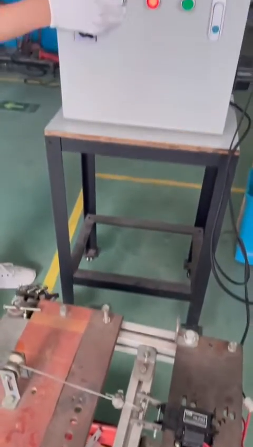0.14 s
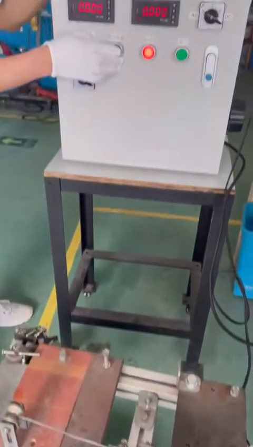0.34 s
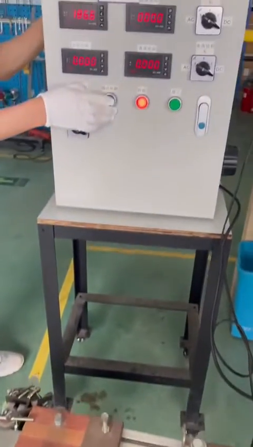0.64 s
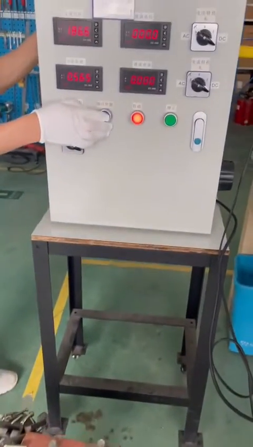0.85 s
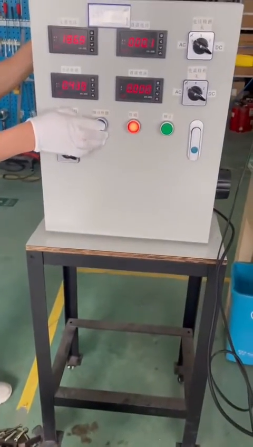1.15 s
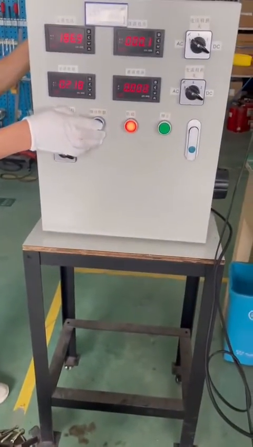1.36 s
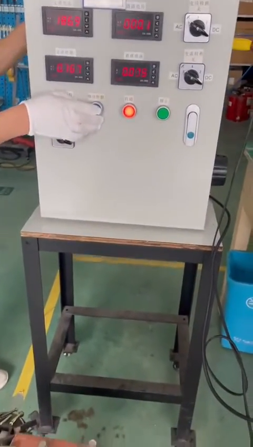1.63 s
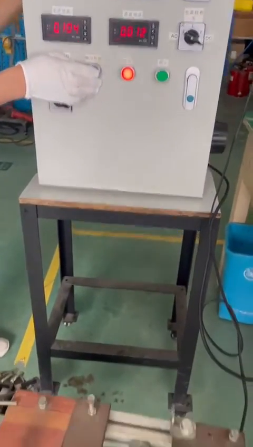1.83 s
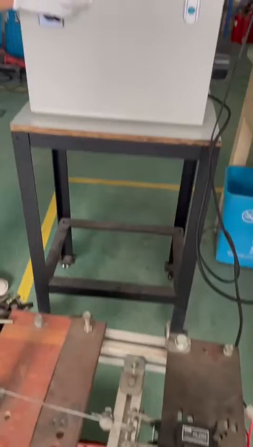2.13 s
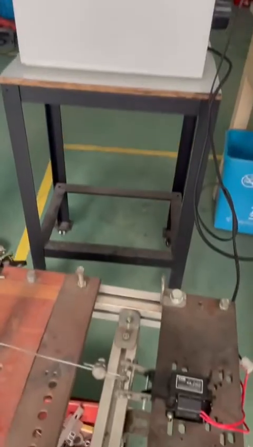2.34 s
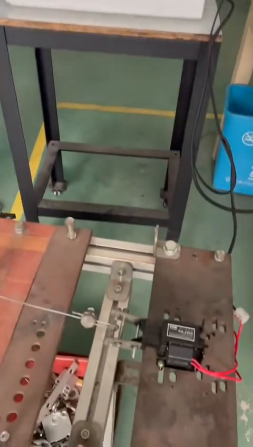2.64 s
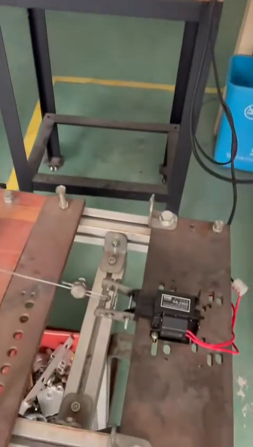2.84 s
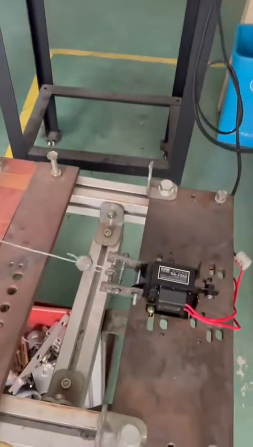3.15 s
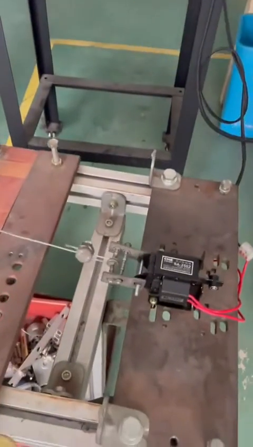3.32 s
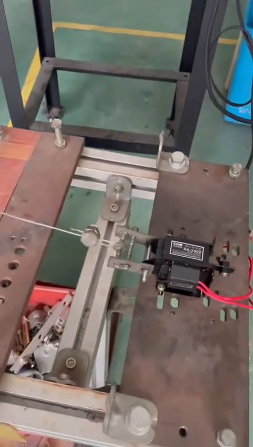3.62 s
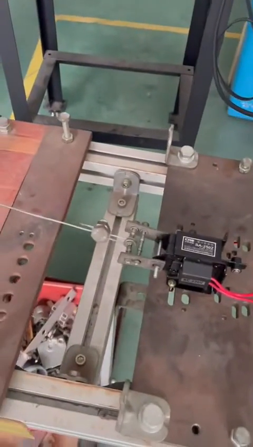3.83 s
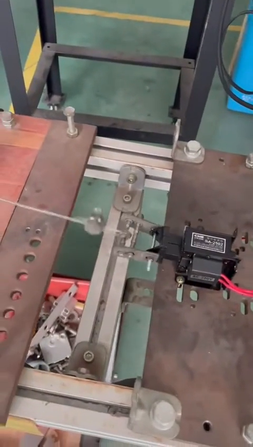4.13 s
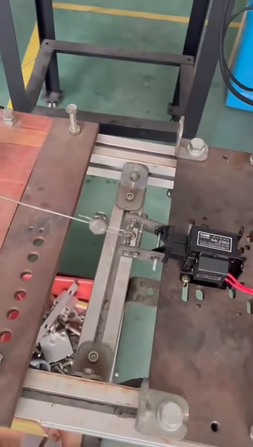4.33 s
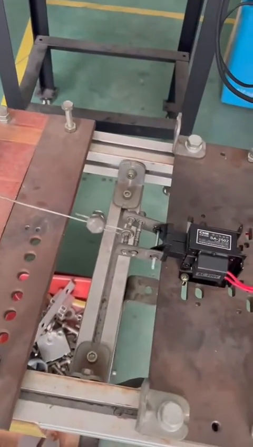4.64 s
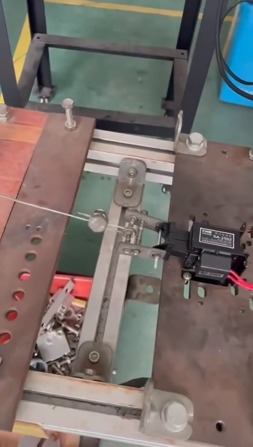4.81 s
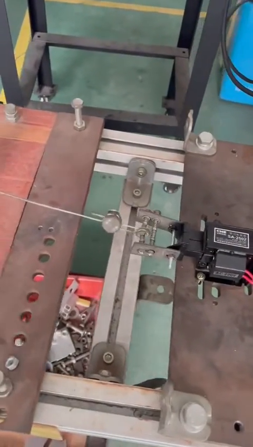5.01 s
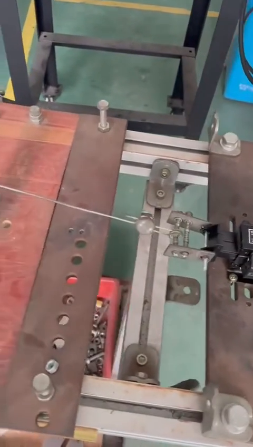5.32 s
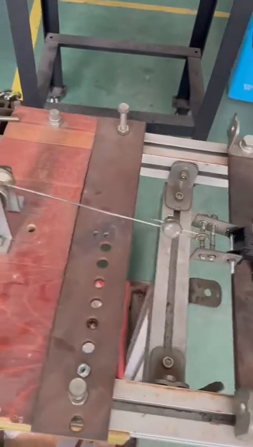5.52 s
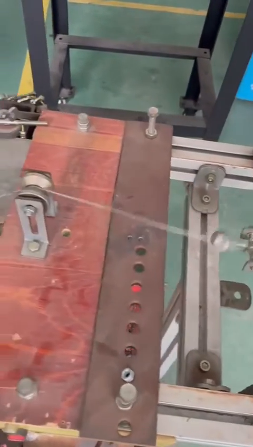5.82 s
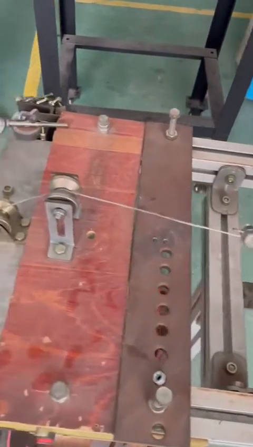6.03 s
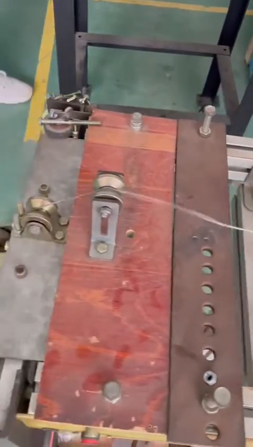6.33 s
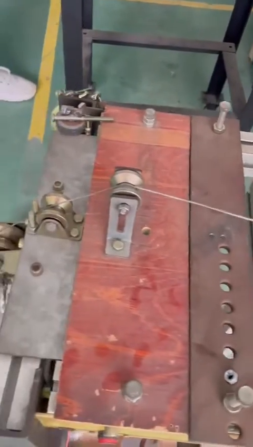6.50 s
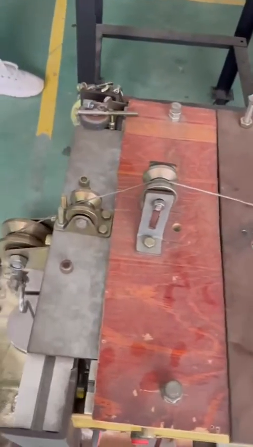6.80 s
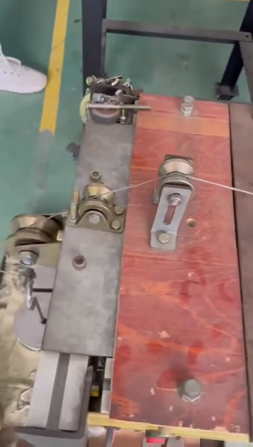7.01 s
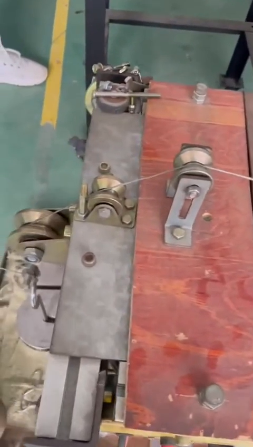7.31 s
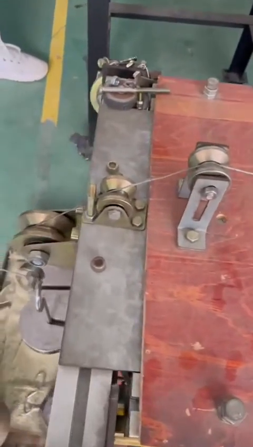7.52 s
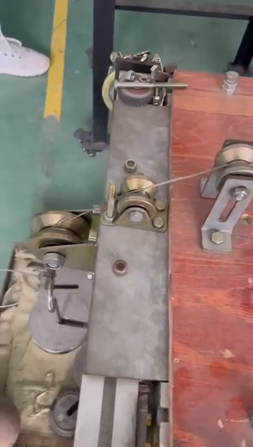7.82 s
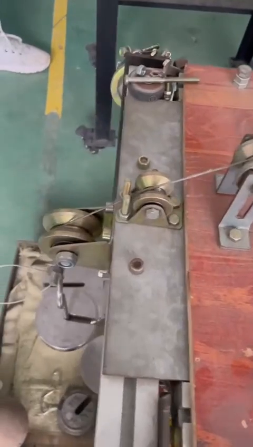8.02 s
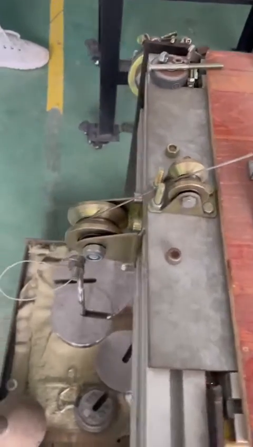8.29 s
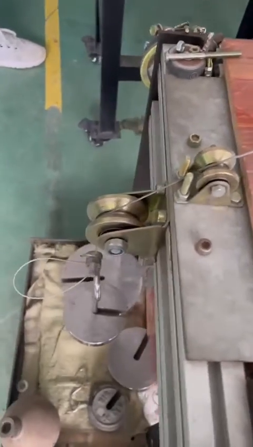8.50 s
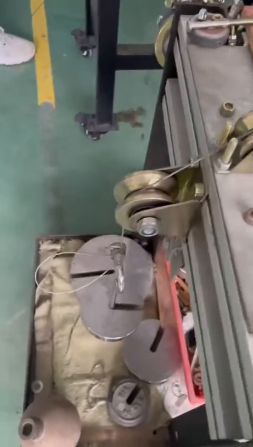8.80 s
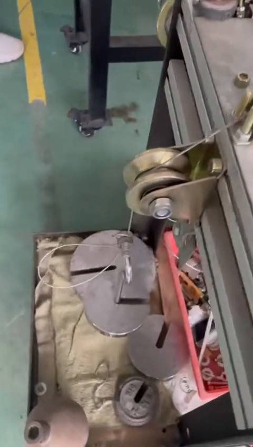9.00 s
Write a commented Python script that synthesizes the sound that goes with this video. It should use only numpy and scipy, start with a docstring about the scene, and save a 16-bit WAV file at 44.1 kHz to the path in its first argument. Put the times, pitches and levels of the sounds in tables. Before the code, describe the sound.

A low factory rumble and motor hum run throughout. Close by, at about 0.3 seconds, a light relay click starts a short buzzing rattle, and a solenoid slams home at 0.4 with a sharp metallic clack that briefly rings the steel frame and loose parts. Around 1.2 seconds it releases with a quieter click, a short scrape and a knock. The same rattle and slam return at about 3.0, 5.7 and 7.9 seconds, the last two ringing a little harder. Softer releases follow at about 4.0, 6.3 and 8.5 seconds, with small clinks and ticks as the plunger settles. From roughly 2 to 4.5 seconds, faint, evenly spaced distant blows echo through the hall, returning more weakly after 8 seconds. A thin motor whine swells slightly around 4 seconds and sinks back. Each clack carries a short hall echo.

```python
"""A relay clicks and an AC solenoid rattles, then slams home, lifting a weight on a wire four times.
The magnet tugs the plunger at twice the mains rate while it travels; it hits the core and rings the
steel rig's frame, lever and loose parts. On release it slides back and knocks on its stop.
Behind it, motors hum and far-off work echoes through a factory hall."""
import sys
import numpy as np
from scipy import signal
from scipy.fft import rfft, irfft
from scipy.io import wavfile
from scipy.ndimage import uniform_filter1d, map_coordinates

SR = 44100
rng = np.random.default_rng(int(sys.argv[2]) if len(sys.argv) > 2 else 0)


def write(x):
    x = np.atleast_2d(x).T
    wavfile.write(sys.argv[1], SR, np.round(np.clip(x, -1, 1) * 32767).astype(np.int16))


N = 403515
T = np.arange(N) / SR
RING_T = T[:SR // 3]  # time axis of one short ring
MAINS_HZ = 50
TUG_HZ = 2 * MAINS_HZ
PULL_LAG_S, THUD_LAG_S, LEVER_JERK_S = 0.0295, 0.001387, 0.0307  # after switch-on, slam, switch-off


# Plunger pulls: on_s, rattle_db, tick_db, swell_db, wire_slack_s
PULL_STROKES = [(0.246, -23.5, -46, -3, 0.016), (2.8677, -32, -39.5, 8.5, 0.0045),
                (5.569, -23.5, -36.5, 3, 0.0115), (7.741, -21.5, -37.5, 3, 0.0087)]
# Rattle spectrum: freq_hz, gain_db
RATTLE_SPECTRUM = [(45, -6.5), (90, -3), (190, 0), (240, -5), (400, -4.5), (1150, -7), (1500, -12.5),
                   (2200, -13.5), (2700, -18.5), (4000, -25.5), (5200, -20), (7000, -33.5), (13500, -36)]
# Spectrum of small metal ticks: freq_hz, gain_db
TICK_SPECTRUM = [(400, -9.5), (2000, 3), (5500, 0.5), (7000, -8), (10000, 0.5), (13500, -3.5)]

def pull_in():
    """The magnet tugs twice per mains cycle: the plunger chatters in its guide and the bed hums."""
    on_s, rattle_db, tick_db, swell_db, slack_s = np.transpose(PULL_STROKES)
    start_s = on_s + PULL_LAG_S
    end_s = np.transpose(CORE_HITS)[0] + 0.0045
    tug_age_s = T % (1 / TUG_HZ)
    tug_index = (T * TUG_HZ).astype(int)
    uneven = amp(0.87 * rng.standard_normal(tug_index[-1] + 1))[tug_index]
    rattle_gain = strokes(start_s, end_s, rattle_db, swell_db, edge_s=0.0023)
    tug_pulse = 0.61 + 0.51 * np.exp(-tug_age_s / 0.0031)
    rattle = rattle_gain * uneven * tug_pulse * amp(0.7 * drift(600)) * noise()
    # the linkage jolts twice as the wire comes taut
    jolt_s, jolt_db = bounces(start_s + slack_s, levels_db=-23, gap_s=0.014, loss_db=2.5, count=2)
    jolts = bursts(jolt_s, jolt_db, rise_s=0.0009, t60_s=0.058)
    # the laminations tick just before the heavy parts move
    tick_gain = strokes(start_s - 0.008, end_s, tick_db, swell_db=0, edge_s=0.0069)
    ticks = tick_gain * uneven * (0.07 + 2.3 * np.exp(-tug_age_s / 0.001)) * noise()
    break_free = bursts(start_s - 0.006, tick_db - 0.5, rise_s=0.00082, t60_s=0.11)
    hum_gain = strokes(start_s, end_s, rattle_db - 8.5, swell_db, edge_s=0.0076)
    hum = hum_gain * np.sqrt(2) * np.sin(2 * np.pi * TUG_HZ * T)
    return colour(rattle + jolts, RATTLE_SPECTRUM) + colour(ticks + break_free, TICK_SPECTRUM) + hum


# Modes of the hollow lever and plunger guide: pitch_hz, gain_db, t60_s
LEVER_MODES = [(350.7, -6.5, 0.11), (430.5, -8, 0.1), (697, -6.5, 0.092), (778, -9, 0.066),
               (879, -7, 0.089), (1001, 1, 0.061), (1105, -6.5, 0.09), (1204, -2.5, 0.063),
               (1505, -7, 0.098), (2080, -11.5, 0.1), (2250, -11, 0.06), (2580, -16.5, 0.1),
               (2830, -13.5, 0.09), (3350, -11, 0.05), (4600, -18, 0.071), (5130, -9.5, 0.045),
               (5300, -15, 0.05)]

def lever_chatter():
    """The lever rings at every tug of the magnet and jolts as the wire comes taut."""
    on_s, rattle_db, _, swell_db, slack_s = np.transpose(PULL_STROKES)
    start_s = on_s + PULL_LAG_S
    slam_s = np.transpose(CORE_HITS)[0]
    tug_s, tug_db = np.transpose([
        (t, db - 15 + swell * (t - start) / (end - start))
        for start, end, db, swell in zip(start_s, slam_s, rattle_db, swell_db)
        for t in np.arange(np.ceil(start * TUG_HZ), end * TUG_HZ) / TUG_HZ])
    chatter = strike(LEVER_MODES, tug_s, tug_db, tilt_db_oct=-1.3, scatter_db=3)
    # after each tug the plunger strikes the far side of its guide
    backlash_s = tug_s + 0.004 * rng.uniform(0.5, 1.5, len(tug_s))
    backlash = strike(LEVER_MODES, backlash_s, tug_db - 6.5, tilt_db_oct=1, scatter_db=5)
    jolt = strike(LEVER_MODES, start_s + slack_s, rattle_db - 7.5, tilt_db_oct=-5, scatter_db=6)
    return chatter + backlash + jolt


# Plunger hits the core: start_s, crack_db, clink_db, thud_db, touch_rel_db, touch_lead_s,
# frame_db, frame_tilt_db_oct, low_clink_hz, high_clink_hz, low_clink_t60_s
CORE_HITS = [(0.393, -14, -9.5, -16, -12, 0.0086, -28.5, 1.5, 5740, 5780, 0.017),
             (3.0104, -14.5, -8.5, -23, -6.5, 0.01, -30.5, 2, 5380, 6070, 0.023),
             (5.7101, -18.5, -5.5, -18, 1, 0.0069, -17, -0.5, 5420, 5940, 0.013),
             (7.8804, -12.5, -13.5, -17.5, -15, 0.0065, -25, 0, 4920, 6370, 0.048)]
# Iron crack spectrum: freq_hz, gain_db
CRACK_SPECTRUM = [(300, -2), (1000, -11), (2000, -1.5), (3000, -2.5), (4500, -7), (5800, -2), (6700, -14.5),
                  (9500, -10), (13500, -13)]
# Bed plate spectrum: freq_hz, gain_db
BED_SPECTRUM = [(60, 0), (130, 3), (175, 1), (230, -14.5), (400, -7.5), (950, -3.5), (1350, -7.5),
                (1800, -15), (5300, -12.5), (7000, -22), (13500, -36.5)]

def slam():
    """Iron meets iron: a short crack, then the bed plate thuds."""
    _, crack_db, _, thud_db, *_ = np.transpose(CORE_HITS)
    crack = bursts(*seating(crack_db), rise_s=0.00087, t60_s=0.022)
    contact_s, contact_db = seating(thud_db)
    thud = bursts(contact_s + THUD_LAG_S, contact_db, rise_s=0.0025, t60_s=0.11)
    return colour(crack, CRACK_SPECTRUM) + colour(thud, BED_SPECTRUM)


def seating(levels_db):
    """Times and levels of each slam's contacts: first touch, full blow, one rebound."""
    slam_s, _, _, _, touch_rel_db, lead_s, *_ = np.transpose(CORE_HITS)
    blow_s, blow_db = bounces(slam_s, levels_db, gap_s=0.0074, loss_db=19, count=2)
    return np.append(slam_s - lead_s, blow_s), np.append(levels_db + touch_rel_db, blow_db)


def core_clink():
    """The laminated core clinks on two well damped notes that depend on how the plunger seats."""
    out = np.zeros(N)
    for slam_s, _, clink_db, _, touch_rel_db, lead_s, _, _, low_hz, high_hz, t60_s in CORE_HITS:
        low = ring(low_hz, rise_s=0.00055, t60_s=t60_s)
        high = ring(high_hz, rise_s=0.00067, t60_s=0.012)
        clink = amp(clink_db) * (low + high)
        out += place([slam_s - lead_s, slam_s], [amp(touch_rel_db - 11) * clink, clink])
    return out


# Steel frame modes: pitch_hz, gain_db, t60_s
FRAME_MODES = [(387.5, -0.5, 0.13), (682, 1, 0.1013), (900, -15.5, 0.11), (972, -12, 0.13),
               (1047, -2, 0.081), (1227, -6, 0.18), (1370, -8, 0.14), (1487, -13.5, 0.12),
               (2120, -11, 0.13), (2252, -12, 0.17), (2760, -13, 0.16), (2912, -6, 0.11), (3280, -13, 0.1),
               (3480, -8.5, 0.11), (3690, -7, 0.16), (4050, -9.5, 0.13), (4300, -12, 0.09),
               (4540, -9.5, 0.1), (4785, -12.5, 0.11), (5130, -10, 0.11), (5030, -11, 0.12),
               (5150, -9, 0.12), (5500, -12.5, 0.08), (5900, -14, 0.09)]

def frame_ring():
    """The frame rings hard at each slam."""
    slam_s, _, _, _, _, _, frame_db, tilt_db_oct, *_ = np.transpose(CORE_HITS)
    return strike(FRAME_MODES, slam_s + THUD_LAG_S, frame_db, tilt_db_oct, scatter_db=2.9)


def frame_shiver(contacts_per_s=55, length_s=0.25, fade_db_per_s=51.5):
    """Loose parts rattle on the frame at random, ever more weakly, after each slam."""
    slam_s = np.transpose(CORE_HITS)[0]
    steps = np.arange(1, length_s * contacts_per_s)[:, None]
    age_s = (steps + rng.uniform(0, 1, (len(steps), len(slam_s)))) / contacts_per_s
    contact_db = np.ravel(-43 - fade_db_per_s * age_s)
    return strike(FRAME_MODES, np.ravel(slam_s + age_s), contact_db, tilt_db_oct=-0.7, scatter_db=3.5)


# Plunger returns: off_s, stop_s, slide_db, lever_db, tick_db, ping_db
RETURN_STROKES = [(1.2066, 1.315, -34, -33.5, -35.5, -38), (3.91, 4.0103, -30, -35, -33, -17),
                  (6.2365, 6.336, -33.5, -32.5, -35, -36), (8.4525, 8.548, -34, -31.5, -37, -20)]
# Plunger settling on its stop: start_s, level_db
STOP_BOUNCES = [(1.3595, -45), (1.382, -49), (4.055, -44), (4.0775, -48), (4.096, -49), (6.3825, -39),
                (6.4295, -44), (6.4475, -51), (8.577, -48), (8.5938, -35), (8.6165, -49)]
# Sliding friction spectrum: freq_hz, gain_db
SLIDE_SPECTRUM = [(100, 2), (350, 11.5), (1000, -3.5), (2000, 1), (3000, -13.5), (5500, -16.5), (7000, -27),
                  (13500, -29)]
# Landing knock spectrum: freq_hz, gain_db
KNOCK_SPECTRUM = [(70, -1.5), (150, 8), (210, -3), (380, 0), (700, -4.5), (1300, -13.5), (2500, -17),
                  (5500, -26.5), (13000, -42)]

def release():
    """The weight drags the plunger back in jerks; the lever lands, then the plunger hits its stop."""
    off_s, stop_s, slide_db, lever_db, tick_db, _ = np.transpose(RETURN_STROKES)
    land_s = stop_s - 0.0159
    slide_gain = strokes(off_s + 0.0064, land_s, slide_db, swell_db=-4, edge_s=0.025)
    slide = slide_gain * amp(2.8 * drift(220)) * noise()
    stop_db = np.full(len(stop_s), -31)
    knock = bursts(np.append(land_s, stop_s), np.append(lever_db, stop_db), rise_s=0.0009, t60_s=0.37)
    tick = bursts(stop_s, tick_db, rise_s=0.00044, t60_s=0.014)
    settle = bursts(*np.transpose(STOP_BOUNCES), rise_s=0.0004, t60_s=0.012)
    # the loose lever clacks as it is jerked away and again as it lands
    clack_s = np.append(off_s + LEVER_JERK_S, land_s)
    clack = bursts(clack_s, np.tile(lever_db, 2), rise_s=0.0016, t60_s=0.093)
    return (colour(slide, SLIDE_SPECTRUM) + colour(knock, KNOCK_SPECTRUM) + colour(tick, TICK_SPECTRUM)
            + band(clack, 800, 3900) + band(settle, 6000, 15000))


def pin_ping():
    """A small pin pings as the plunger hits its stop, too high to carry through the hall."""
    _, stop_s, *_, ping_db = np.transpose(RETURN_STROKES)
    return place(stop_s, np.outer(amp(ping_db), ring(12700, rise_s=0.0007, t60_s=0.011)))


# Pivot knocks: start_s, level_db, tilt_db_oct
PIVOT_KNOCKS = [(0.293, -26.5, 0), (0.3065, -25.5, -1.5), (1.2105, -38.5, -1.5), (1.238, -43, -3),
                (1.2625, -42, -4), (1.307, -37, 1), (2.902, -32, 1), (2.917, -33.5, -5.5), (3.939, -34, 2),
                (3.964, -36, 5), (3.9985, -43, -7), (4.011, -36, 0), (5.611, -22.5, -1.5),
                (5.716, -18.5, -2), (6.267, -37, -1), (6.275, -36, -5), (6.286, -40, 5), (6.311, -42, -8),
                (6.3401, -43, -5), (7.8725, -23.5, 1), (7.886, -17.5, -1), (7.897, -22.5, 1),
                (8.485, -36, -2), (8.499, -33, -0.5), (8.547, -30.5, -2), (8.559, -38, -5)]

def lever_knocks(catches_per_s=90):
    """The lever knocks in its pivot as the load shifts, and rings as the returning plunger catches."""
    off_s, stop_s, slide_db, *_ = np.transpose(RETURN_STROKES)
    catch_s, catch_db = np.transpose([
        (t, db - 18) for start, end, db in zip(off_s + LEVER_JERK_S, stop_s, slide_db)
        for t in np.arange(start, end, 1 / catches_per_s)])
    catch_s += rng.uniform(0, 1, len(catch_s)) / catches_per_s
    knocks = strike(LEVER_MODES, *np.transpose(PIVOT_KNOCKS), scatter_db=3)
    return knocks + strike(LEVER_MODES, catch_s, catch_db, tilt_db_oct=-3.5, scatter_db=5)


# Link and washer contacts: start_s, pitch_hz, level_db, t60_s, grit_share
LINK_HITS = [(0.3985, 5500, -19, 0.028, 1), (1.183, 2280, -40, 0.086, 0.5), (1.237, 5270, -36.5, 0.04, .9),
             (1.316, 5300, -33, 0.02, .9), (2.893, 5200, -30.5, 0.076, 0.8), (2.987, 5160, -23, 0.053, .9),
             (3.018, 5400, -22, 0.023, 1), (3.958, 4970, -32, 0.045, .95), (3.9935, 5020, -29, 0.022, 0.4),
             (4.0115, 4500, -32, 0.018, .9), (4.089, 5100, -35.5, 0.021, 0.6),
             (5.681, 4680, -21, 0.044, .35), (6.339, 4900, -31, 0.019, .85), (6.429, 5000, -35, 0.016, .8),
             (7.873, 4900, -25, 0.03, .9), (7.887, 5020, -15, 0.04, .6), (7.897, 5100, -20, 0.05, .6),
             (8.4655, 5500, -39, 0.025, .9), (8.475, 5200, -35, 0.04, 1),
             (8.4808, 1880, -22.5, 0.044, 0.97), (8.495, 5730, -34.5, 0.03, 0.93),
             (8.5335, 5200, -41, 0.02, .9), (8.541, 4300, -32, 0.022, .85)]

def link_clinks():
    """Links and washers strike each other: a dry snap around one short note."""
    sounds = []
    for _, pitch_hz, level_db, t60_s, grit_share in LINK_HITS:
        grit = unit(band(rng.standard_normal(len(RING_T)), pitch_hz / 1.3, pitch_hz * 1.13))
        snap = envelope(rise_s=0.0004, t60_s=t60_s) * grit
        note = ring(pitch_hz, rise_s=0.0007, t60_s=t60_s)
        sounds.append(amp(level_db) * (np.sqrt(1 - grit_share) * note + np.sqrt(grit_share / 2) * snap))
    return place(np.transpose(LINK_HITS)[0], sounds)


# Ringing loose parts: start_s, pitch_hz, level_db
CHIME_NOTES = [(0.436, 1230, -24), (0.435, 2290, -26.5), (0.435, 1370, -33), (5.756, 1180, -34),
               (7.924, 1220, -22), (8.96, 5360, -47), (8.965, 5080, -44)]

def chimes():
    """Shaken loose parts sing briefly, one mode each."""
    notes = [amp(db) * ring(hz, rise_s=0.03, t60_s=0.19) for _, hz, db in CHIME_NOTES]
    return place(np.transpose(CHIME_NOTES)[0], notes)


def relay():
    """A light click just ahead of each movement; the relay's spring buzzes on after switch-off."""
    on_s, off_s = np.transpose(PULL_STROKES)[0], np.transpose(RETURN_STROKES)[0]
    on_click = bursts(on_s, levels_db=-44, rise_s=0.0012, t60_s=0.14)
    off_click = bursts(off_s, levels_db=-43, rise_s=0.0006, t60_s=0.025)
    spring = bursts(off_s, levels_db=-49, rise_s=0.0036, t60_s=0.27)
    return colour(on_click + off_click + spring, TICK_SPECTRUM)


# Narrow spectral dips: centre_hz, width_hz, gain_db
NARROW_DIPS = [(1350, 42, 0), (2415, 170, -5.5), (3180, 100, -4.5), (3780, 130, -9), (4190, 140, -5.5)]

def narrow_dips(x):
    """A few narrow dips cut into the midrange of the rattles and knocks."""
    for centre_hz, width_hz, gain_db in NARROW_DIPS:
        in_band = signal.lfilter(*signal.iirpeak(centre_hz, centre_hz / width_hz, fs=SR), x)
        x = x - (1 - amp(gain_db)) * in_band
    return x


def hall_echo(x, air_drift_s=0.00007):
    """Quick reflections from benches and floor, then the hall's tail; moving air shifts their arrival."""
    t = T[:2 * SR]
    early, low, high = rng.standard_normal((3, len(t)))
    response = (amp(-49.5) * band(early, 93, 13000) * amp(-60 * t / 0.47)
                + amp(-46) * band(low, 60, 3300) * amp(-60 * t / 0.73)
                + amp(-52) * band(high, 2000, 11000) * amp(-60 * t / 0.89))
    wet = convolve(x, response * np.clip(t / 0.0039, 0, 1))
    return map_coordinates(wet, [(T + air_drift_s * drift(70)) * SR], mode="nearest")


# Runs of distant blows: start_s, end_s, level_db
FAR_RUNS = [(1.859, 4.4, -37.5), (8.08, 8.9, -47.5)]
# Distant clatter spectrum: freq_hz, gain_db
FAR_SPECTRUM = [(100, -6), (350, 4.5), (1100, -3.5), (1800, -8), (3000, -11), (5500, -15.5), (7000, -22.5),
                (10000, -29), (13000, -40.5)]

def far_work(period_s=0.5606):
    """Evenly spaced distant blows arrive as swells of reverberation with a duller tail."""
    blow_s, blow_db = np.transpose([
        (t, db) for start, end, db in FAR_RUNS for t in np.arange(start, end, period_s)])
    swell = bursts(blow_s, blow_db, rise_s=0.2, t60_s=0.49)
    tail = band(bursts(blow_s, blow_db - 2, rise_s=0.077, t60_s=1.9), 80, 5500)
    return colour(swell + tail, FAR_SPECTRUM) * amp(1.1 * drift(40))


# Faint scrapes: start_s, level_db, t60_s
SCRAPES = [(0.0, -52.5, 0.25), (5.022, -61.5, .25), (6.54, -59, 0.28), (6.751, -52, .3), (7.293, -63, 0.46),
           (8.592, -57.5, 1.8)]

def rustles():
    """Soft nearby scrapes swell and fade."""
    rub = sum(bursts([start_s], [db], 0.17 * t60_s, t60_s) for start_s, db, t60_s in SCRAPES)
    spectrum = [(500, -20.5), (2500, 0), (5500, 0), (8000, -8.5), (13000, -12)]
    return colour(rub * amp(1.2 * drift(60)), spectrum)


# Low thumps: start_s, relative_db
THUMPS = [(4.649, -40), (5.969, -30.5), (8.405, -28.5)]

def thumps():
    """Dull thumps, each one damped note deep in the bass."""
    thump = amp(15.5) * ring(67, rise_s=0.014, t60_s=0.14)
    return convolve(impulses(*np.transpose(THUMPS)), thump)


# Factory rumble spectrum: freq_hz, gain_db
RUMBLE_SPECTRUM = [(15, -41), (25, -18), (60, -0.5), (333, -20), (361, -20.5), (401, -24), (482, -18),
                   (522, -23.5), (1460, -34.5), (3410, -40), (5630, -47.5), (6960, -55), (7740, -68.5),
                   (9560, -57), (13800, -69.5)]

def factory_rumble(level_db=-37.5):
    """Low factory noise whose eight bands waver independently."""
    edges_hz = np.geomspace(20, 16000, 9)
    air = sum(band(noise(), low_hz, high_hz) * amp(drift(7) + 0.8 * drift(1.8))
              for low_hz, high_hz in zip(edges_hz, edges_hz[1:]))
    return amp(level_db) * unit(band(colour(air, RUMBLE_SPECTRUM), 34, 16000))


def motors(shaft_hz=49.1, whine_hz=479, peak_s=4.08, width_s=3):
    """A motor shaft hums; a thin whine swells once and sinks back."""
    shaft = amp(-40 + 2 * drift(3.2)) * np.sin(2 * np.pi * shaft_hz * T + 0.7 * drift(2.6))
    swell_db = 19 * np.exp(-((T - peak_s) / width_s) ** 2)
    whine = amp(-64 + swell_db + 2 * drift(9)) * np.sin(2 * np.pi * whine_hz * T + 0.77 * drift(14))
    return shaft + whine


def strike(modes, times_s, levels_db, tilt_db_oct, scatter_db):
    """Hard blows on a steel body; the contact is rough, so each one favours other modes."""
    rings = np.array([amp(db) * ring(hz, rise_s=0.00078, t60_s=t60_s) for hz, db, t60_s in modes])
    octaves = np.log2(np.transpose(modes)[0] / 2000)
    polarity, scatter = rng.standard_normal((len(times_s), 2, len(modes))).swapaxes(0, 1)
    mode_db = levels_db[:, None] + np.outer(tilt_db_oct, octaves) + scatter_db * scatter
    return place(times_s, (np.sign(polarity) * amp(mode_db)) @ rings)


def bursts(times_s, levels_db, rise_s, t60_s):
    """Crowded modes after each blow: noise that rises and dies away."""
    shape = envelope(rise_s, t60_s, T[:int(1.5 * t60_s * SR)])
    power = convolve(impulses(times_s, levels_db) ** 2, (shape / shape.max()) ** 2)
    return noise() * np.sqrt(np.maximum(power, 0))


def bounces(times_s, levels_db, gap_s, loss_db, count):
    """Times and levels of blows that repeat at even gaps, weaker every time."""
    repeat = np.arange(count)[:, None]
    bounce_db = levels_db - repeat * loss_db + np.zeros(len(times_s))
    return np.ravel(times_s + repeat * gap_s), np.ravel(bounce_db)


def strokes(starts_s, ends_s, levels_db, swell_db, edge_s):
    """Gain during a set of movements, with soft edges."""
    return sum(np.interp(T, [start, min(start + edge_s, end), end, end + edge_s],
                         [0, amp(db), amp(db + swell), 0])
               for start, end, db, swell in np.broadcast(starts_s, ends_s, levels_db, swell_db))


def ring(pitch_hz, rise_s, t60_s):
    """One damped mode."""
    return envelope(rise_s, t60_s) * np.sin(2 * np.pi * pitch_hz * RING_T)


def envelope(rise_s, t60_s, t=RING_T):
    """Exponential rise and decay."""
    return (1 - np.exp(-t / rise_s)) * amp(-60 * t / t60_s)


def impulses(times_s, levels_db):
    """One impulse per blow."""
    out = np.zeros(N)
    samples = np.round(np.asarray(times_s) * SR).astype(int)
    np.add.at(out, np.clip(samples, 0, N - 1), amp(levels_db))
    return out


def place(times_s, sounds):
    """Mix short sounds in at their times."""
    out = np.zeros(N + len(RING_T))
    for start_s, sound in zip(times_s, sounds):
        i = int(np.clip(start_s * SR, 0, N))
        out[i:i + len(sound)] += sound
    return out[:N]


def colour(x, spectrum, size=4096):
    """Minimum-phase filter through (freq_hz, gain_db) points; white noise keeps its power."""
    freq_hz, gain_db = np.transpose(spectrum)
    bins_hz = np.maximum(np.fft.rfftfreq(size, 1 / SR), 1)
    bins_db = np.interp(np.log(bins_hz), np.log(freq_hz), gain_db)
    cepstrum = irfft(np.log(amp(bins_db)))
    cepstrum[1:size // 2] *= 2
    cepstrum[size // 2 + 1:] = 0
    response = irfft(np.exp(rfft(cepstrum)))
    return convolve(x, response / np.linalg.norm(response))


def band(x, low_hz, high_hz):
    """Band-pass."""
    return signal.sosfilt(signal.butter(2, [low_hz, high_hz], "band", fs=SR, output="sos"), x)


def convolve(x, response):
    """Apply an impulse response."""
    return signal.oaconvolve(x, response)[:N]


def drift(rate_hz):
    """Smooth random drift, spread near 1."""
    hold = int(SR / rate_hz)
    steps = np.repeat(rng.standard_normal(N // hold + 1), hold)
    return 1.2 * uniform_filter1d(steps, hold)[:N]


def noise():
    """White noise, rms 1."""
    return rng.standard_normal(N)


def unit(x):
    """Scale to rms 1."""
    return x / np.std(x)


def amp(db):
    """Decibels to gain."""
    return np.exp(np.asarray(db) * (np.log(10) / 20))


def scene():
    """The rig close by, its echo and the factory behind it, in mono."""
    rig = narrow_dips(pull_in() + slam() + release() + relay())
    steel = lever_chatter() + frame_ring() + frame_shiver() + lever_knocks()
    steel += core_clink() + link_clinks()
    echo = hall_echo(rig + amp(-4.5) * steel)
    background = far_work() + rustles() + thumps() + factory_rumble() + motors()
    return (rig + steel + pin_ping() + chimes() + echo + background)[None]


def record(dry, notch_hz=(6950, 8400), top_hz=13500):
    """The phone rounds the highest peaks, notches the treble and cuts the top."""
    notch = signal.butter(3, notch_hz, "bandstop", fs=SR, output="sos")
    lowpass = signal.ellip(8, 0.2, 70, top_hz, fs=SR, output="sos")
    return signal.sosfilt(lowpass, signal.sosfilt(notch, np.tanh(dry)))


dry = scene()
out = record(dry)
write(out)
```